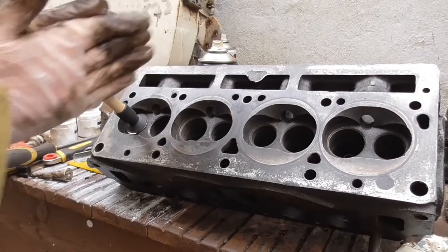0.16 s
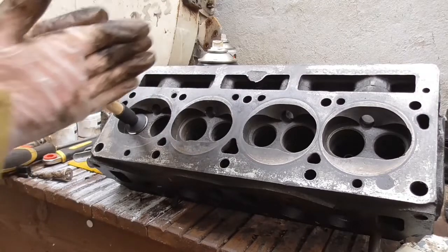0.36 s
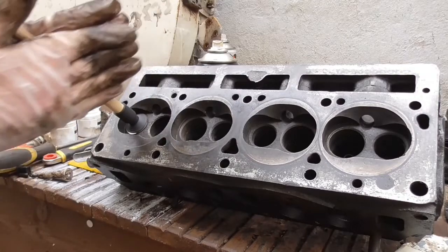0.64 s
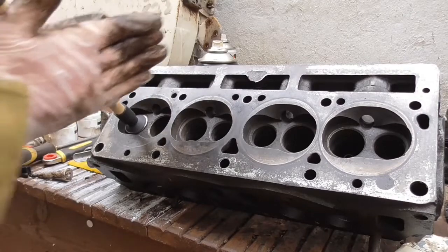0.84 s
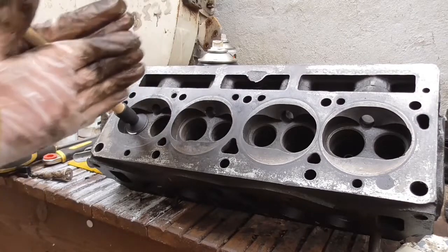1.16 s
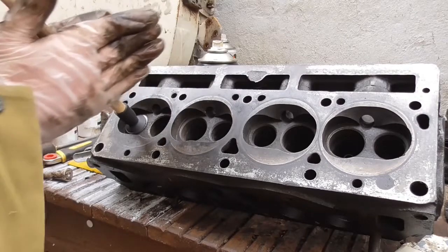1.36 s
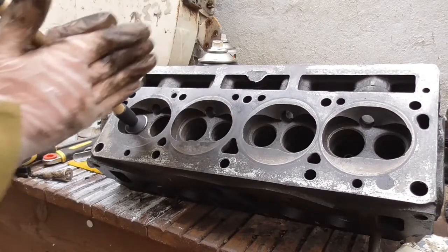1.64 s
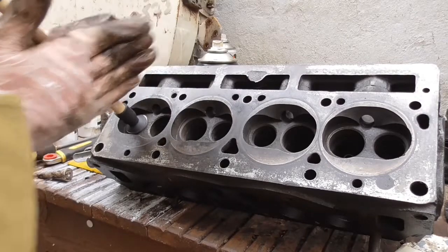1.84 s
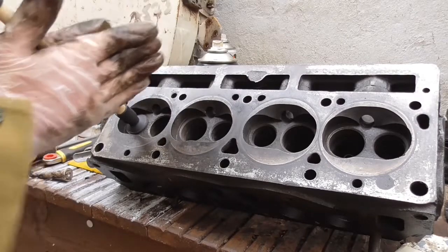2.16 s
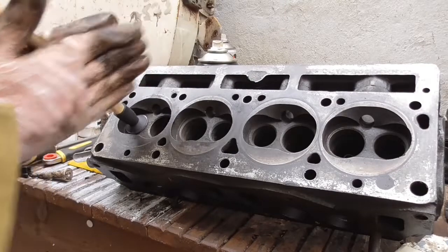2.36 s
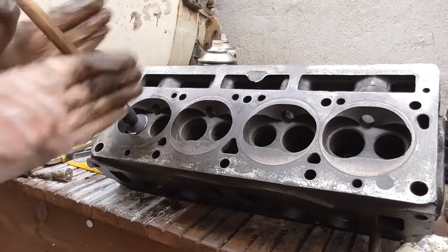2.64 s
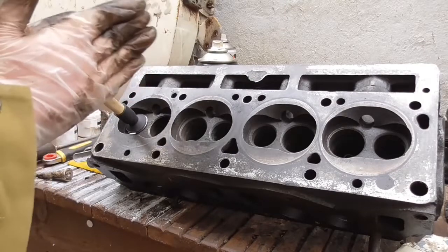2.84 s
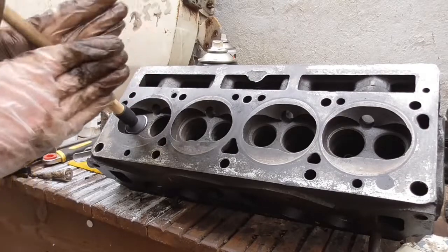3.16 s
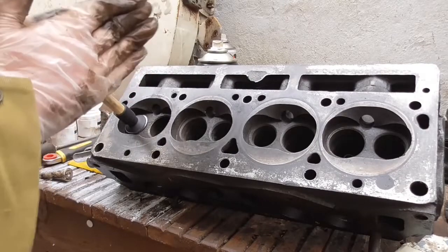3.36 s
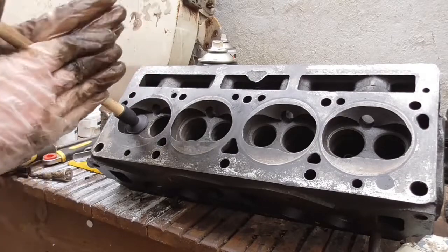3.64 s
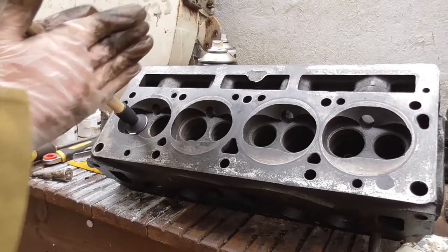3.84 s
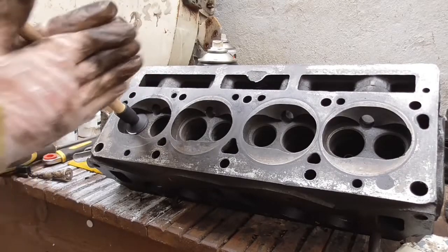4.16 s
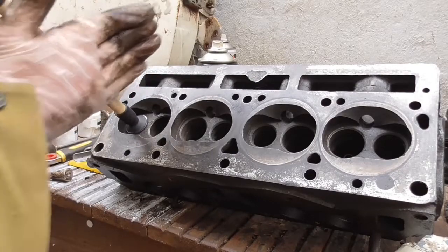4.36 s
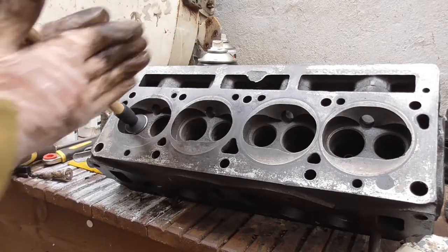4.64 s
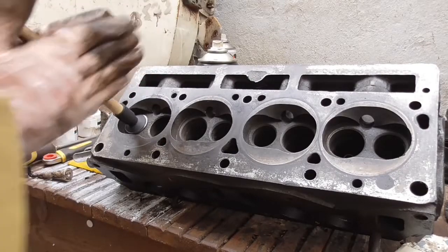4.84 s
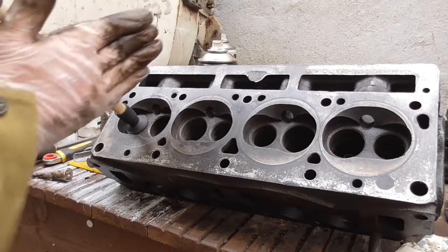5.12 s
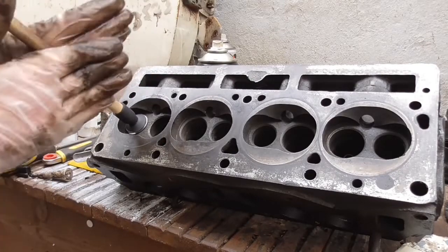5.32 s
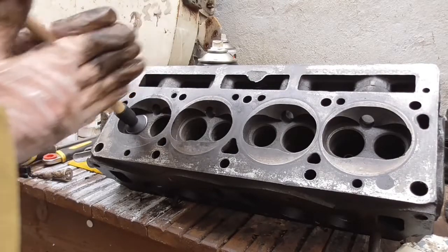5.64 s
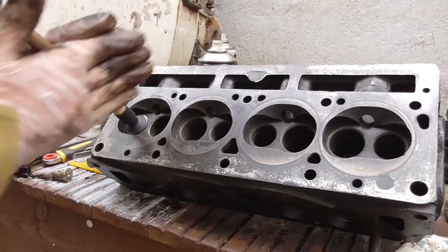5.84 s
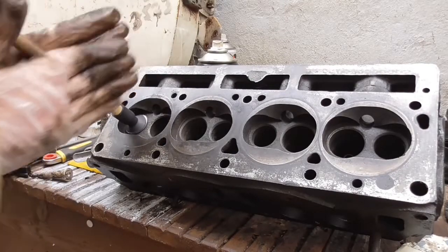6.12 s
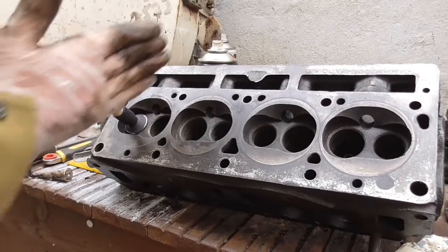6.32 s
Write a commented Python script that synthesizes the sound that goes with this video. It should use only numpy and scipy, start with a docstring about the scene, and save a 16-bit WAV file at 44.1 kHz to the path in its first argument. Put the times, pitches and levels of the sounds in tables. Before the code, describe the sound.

From 0 s, already under way, a metal valve is ground back and forth in abrasive paste, close to the microphone. Each stroke lasts about a fifth of a second: a bright sandy hiss rising and falling with speed, a dry metallic ring from valve and heavy casting, and a hollow, woody-sounding judder near 1 kHz, broken by uneven short bites. Strokes lengthen slightly from 2 s and stop around 2.55 s. Tiny wet smacks and crackles fill the gap near 2.8 s; one longer scrape runs from 2.85 to 3.2 s, then another sticky pause until 3.4 s. A strong biting stroke restarts the steady rhythm, which continues to the cut-off near 6.5 s. Behind lies soft distant traffic: a low car hum from 1.5 s, then a lorry and passing drones from about 4 s, swelling loudest near 5.8 s before easing.

```python
"""An engine valve is lapped: a stick rolled between the palms twists it back and forth on its seat.
From the start grinding paste hisses with the speed of each twist and rings casting and valve; where the
grit bites, stick and slip judder the valve near 1 kHz. Behind it filtered noise makes far traffic.
Wet smacks crackle, mostly in the pauses around 2.7 and 3.3 s. From 1.5 s on wavering sine tones add
a car, then a lorry and passing drones, and the traffic swells to its loudest near 5.8 s."""
import sys
import numpy as np
from scipy import signal
from scipy.fft import rfft, irfft, next_fast_len
from scipy.io import wavfile
from scipy.ndimage import uniform_filter1d

SR = 44100
rng = np.random.default_rng(int(sys.argv[2]) if len(sys.argv) > 2 else 0)


def pcm_store(signal):
    """Save signal as 16-bit PCM."""
    levels = np.round(np.clip(np.atleast_2d(signal), -1, 1) * 32767)
    wavfile.write(sys.argv[1], SR, levels.astype(np.int16).T)


N = 285768
TIME = np.arange(N) / SR   # seconds

# Table levels are relative: each layer trims them further.
# twists of the stick, forward and back in turn: (start [s], end [s], grit [dB], judder [dB])
TWISTS = [(-.12, .086, -45.5, -39.5), (.084, .28, -48, -34), (.284, .5, -44.5, -36.5),
          (.508, .73, -46, -36), (.728, .93, -44.5, -35.5), (.924, 1.136, -42, -32.5),
          (1.15, 1.348, -44, -31.5), (1.358, 1.535, -42.5, -34), (1.552, 1.778, -43, -32.5),
          (1.782, 2.012, -41, -33), (2.02, 2.28, -42.5, -33), (2.276, 2.545, -42.5, -35.5),
          (2.851, 3.195, -42.5, -32.5), (3.425, 3.705, -41, -34), (3.708, 3.92, -43.5, -32.5),
          (3.931, 4.124, -42, -33), (4.129, 4.35, -42, -35.5), (4.356, 4.555, -41.5, -36),
          (4.566, 4.775, -40.5, -35), (4.776, 4.96, -41.5, -33), (4.981, 5.165, -42.5, -35),
          (5.183, 5.36, -42.5, -33.5), (5.385, 5.56, -42.5, -32.5), (5.578, 5.745, -42, -34),
          (5.78, 5.99, -42.5, -37), (6, 6.205, -41, -34), (6.215, 6.4, -43, -44.5), (6.42, 6.6, -41, -35)]
# how each direction sounds: (fastest point [share of twist], casting ring over grit [dB],
# valve ring over grit [dB])
FORWARD_TWIST = (.44, -6.5, -7)
BACK_TWIST = (0.58, -13, -6.5)
# the hardest bites of the grit: (start [s], length [s], level [dB])
BITES = [(.033, 0.014, -31.5), (.135, 0.027, -28.5), (.193, 0.019, -28), (.225, 0.029, -31),
         (.539, 0.036, -33.5), (.772, 0.019, -31), (.812, .015, -30.5), (1.029, .023, -31),
         (1.511, 0.017, -30.5), (1.576, 0.04, -32.5), (2.035, 0.023, -33.5), (2.261, 0.0138, -35),
         (2.317, 0.047, -30), (2.384, 0.016, -28.5), (2.462, .021, -32.5), (3.036, 0.032, -29),
         (3.101, 0.0161, -31.5), (3.501, 0.0234, -25.5), (3.73, .012, -33), (3.813, .018, -29),
         (4.063, .015, -33), (4.147, 0.039, -31), (4.312, 0.035, -30), (4.382, 0.044, -35.5),
         (4.642, .023, -32), (4.876, 0.045, -29), (5.216, .026, -29.5), (5.245, .021, -29.5),
         (5.438, .018, -28), (5.466, .023, -30.5), (5.61, 0.037, -31), (5.705, 0.056, -32.5)]
# wet paste and skin smack as the grip shifts: (start [s], level [dB], time to fall 60 dB [s])
SMACKS = [(0.771, -41, 0.044), (1.83, -43, 0.034), (2.79, -46.5, 0.084), (2.826, -54, 0.28),
          (3.297, -48.5, 0.18), (3.336, -54, 0.28), (3.393, -49.5, 0.13)]
# the palms slide off and on to the stick: (peak time [s], half length [s], level [dB])
SLIDES = [(2.542, 0.025, -48), (2.597, 0.037, -80), (2.89, 0.031, -54), (3.167, 0.027, -50),
          (3.465, 0.034, -46.5)]

# resonances that the finest grit rings: (frequency [Hz], width [Hz], level [dB])
GRIT_MODES = [(6910, 70, -10), (8072, 45, -5), (8812, 60, -3.5), (9471, 50, 0), (9825, 50, -6),
              (9945, 60, -4), (11500, 60, -12), (11800, 80, -12), (12870, 90, -13)]
# resonances of the casting: (frequency [Hz], width [Hz], level [dB])
CASTING_MODES = [(1769, 4.2, 3.5), (1843, 7.1, 3), (1863, 106, -5.5), (2310, 18.6, 2), (3003, 140, -10)]
# resonances of the valve: (frequency [Hz], width [Hz], level [dB])
VALVE_MODES = [(3544, 20.6, 0), (3724, 42, -4), (3930, 42, -9.5), (4910, 14, -10.5), (5186, 15.4, -4.5)]
# low resonances of valve and head that lock into a judder: (frequency [Hz], width [Hz], level [dB])
JUDDER_MODES = [(860.4, 15.3, -9.5), (931, 46.5, -3.5), (969, 43.8, 0.5), (998.2, 18.7, -1),
                (1090, 53, -21), (1149, 9.6, -26.5)]
# resonances rattled by loose grains: (frequency [Hz], width [Hz], level [dB])
RATTLE_MODES = [(1121, 42, 0), (1186, 32, -1), (1315, 110, -5), (1482, 50, -6)]

# spectrum of the grit hiss: (frequency [Hz], level per Hz [dB])
GRIT_SPECTRUM = [(1400, -8), (2500, -9.5), (4500, -8), (6000, -10.5), (7500, -6.5), (8600, -1), (9700, 0.5),
                 (10800, -4), (12300, -9.5), (13200, -6), (14000, -14.5), (15000, -44)]
# spectrum of the smacks: (frequency [Hz], level per Hz [dB])
SMACK_SPECTRUM = [(1500, -17), (7000, -11.5), (10000, 0), (13000, -12.5), (15000, -24)]
# spectrum of the traffic noise: (frequency [Hz], level per Hz [dB])
ROAD_SPECTRUM = [(28, -14), (45, -7.5), (65, -2), (85, -11), (130, -2), (240, 1.5), (400, -3), (700, -3.5),
                 (1000, -3), (1400, -13.5), (2000, -24.5), (3200, -30), (6500, -29), (10000, -26),
                 (15000, -40)]
# left-right likeness of the grit: (frequency [Hz], likeness [-1..1])
GRIT_LIKENESS = [(1500, 0.69), (3300, 1), (3900, 0.89), (5500, 0.81), (7300, 0.0028), (8700, 0.68),
                 (11500, 0.63), (13300, -0.16), (14500, -.2)]
# left-right likeness of the road: (frequency [Hz], likeness [-1..1])
ROAD_LIKENESS = [(60, 0.89), (150, 0.99), (300, 0.88), (700, 0.68), (2000, 0.23), (10000, 0.1)]
# stereo balance of the grit: (frequency [Hz], left minus right [dB])
GRIT_BALANCE = [(2000, -0.5), (5000, 0.5), (7500, 1), (9500, 1), (12500, -6), (14500, -4)]
# stereo balance of the road: (frequency [Hz], left minus right [dB])
ROAD_BALANCE = [(200, -1.8), (900, -1.2)]

# traffic noise: (time [s], rumble [dB], tyre noise [dB])
TRAFFIC = [(0, -52.5, -57.5), (1, -54, -55), (2.2, -51.5, -56), (3.3, -49.5, -55), (5, -52.5, -52.5),
           (5.8, -45, -48.5), (6.48, -49.5, -52.5)]
# a car speeds up and eases off: (time [s], firing rate [Hz], firing tone [dB])
CAR = [(1.5, 60.5, -61), (1.83, 62.3, -55.5), (2.75, 73.4, -60.5), (3.38, 70.2, -61), (3.9, 57.5, -54)]
# a lorry swells, then fades: (time [s], firing rate [Hz], firing tone [dB], its octave [dB])
LORRY = [(4.0, 49.1, -59, -69), (4.718, 49.6, -57, -67), (5.046, 50.8, -65, -52), (5.402, 51.8, -49, -44),
         (5.63, 51.8, -46, -58), (5.9, 51.8, -61, -56)]
# drones of passing vehicles: (loudest time [s], half length [s], frequency [Hz], level [dB])
DRONES = [(4.75, .35, 252, -54), (4.6, .4, 181, -61), (5.9, .25, 214, -51), (5.95, .35, 124, -56)]

EASY_TWIST_S = 0.18   # a twist this long is near a plain half swing; longer ones start and end more gently
CATCHES_PER_S, CATCH_S, CATCH_DB = 18, 0.013, 0.5   # lesser bites; mean level over the twist's judder
BITE_ATTACK_S, BITE_RELEASE_S = .007, .0044
JUDDER_LEAD_S = .00005   # the judder reaches the left side first
SMACK_GRAINS_PER_S, SMACK_SPREAD_DB = 4000, 1.5
ENGINE_FADE_DB_PER_S = 11   # before and after a vehicle is within earshot
CUTOFF_HZ = 15500


def from_db(db):
    """Decibels to gain."""
    return 10 ** (np.asarray(db) / 20)


def rms_one(x):
    """Scales a sound to rms 1."""
    return x / np.sqrt(np.mean(x ** 2) + 1e-20)


def in_time(rows):
    """Each column of a curve at every sample."""
    s, *columns = np.transpose(rows)
    return [np.interp(TIME, s, column) for column in columns]


def at_hz(points, hz):
    """Reads a curve on a log-frequency axis."""
    known_hz, values = np.transpose(points)
    return np.interp(np.log(hz + 1), np.log(known_hz), values)


def drift(rate_hz):
    """Slow random wander of rms 1: twice-smoothed noise, made at every 40th sample."""
    r = np.exp(-80 * np.pi * rate_hz / SR)
    noise = rng.standard_normal(N // 40 + 2002)
    slow = signal.lfilter([1], [1, -2 * r, r * r], noise)[2000:]   # drop the settling
    return np.interp(np.arange(N) / 40, np.arange(len(slow)), rms_one(slow))


def bump(peak_s, half_s):
    """A smooth swell and fade around its peak."""
    return np.exp(-np.minimum(((TIME - peak_s) / half_s) ** 2, 20))


def pan(left_db):
    """Gains of the two channels, left over right by so many dB."""
    return from_db(np.array([[.5], [-.5]]) * left_db)


def widen(mid, side, alike):
    """Left and right of a given likeness from two unrelated signals."""
    alike = np.clip(alike, -.99, .99)
    return np.sqrt(1 + alike) * mid + np.sqrt(1 - alike) * side * np.array([[1], [-1]])


def colour(pair, spectrum, likeness, balance):
    """Gives two steady noises a spectrum and a stereo image; rms 1."""
    size = next_fast_len(N)
    hz = np.arange(size // 2 + 1) * SR / size
    image = widen(*rfft(pair, size), at_hz(likeness, hz)) * pan(at_hz(balance, hz))
    shaped = image * from_db(at_hz(spectrum, hz))
    return rms_one(irfft(shaped, size)[:, :N])


def resonate(force, modes, gains=None):
    """Parallel resonances, each with an optional moving gain; white force of rms 1 comes out near rms 1."""
    out, power = 0, 0
    for k, (hz, width_hz, db) in enumerate(modes):
        r = np.exp(-np.pi * width_hz / SR)
        feed = (1 - r * r) / 2 * np.array([1, 0, -1])
        feedback = [1, -2 * r * np.cos(2 * np.pi * hz / SR), r * r]
        drive = force if gains is None else force * gains[k]
        # neighbouring modes take opposite signs
        out = out + (-1) ** k * from_db(db) * signal.lfilter(feed, feedback, drive)
        power += from_db(db) ** 2 * np.pi * width_hz / SR
    return out / np.sqrt(power)


def grains(per_s, spread_db):
    """Two streams of tiny fractures of uneven size, struck at the same instants; rms 1."""
    sizes = from_db(spread_db * rng.standard_normal(N))
    struck = rng.random(N) < per_s / SR
    return rms_one(sizes * struck * rng.standard_normal((2, N)))


def twisting(grit_rest=0.22, ring_rest=0.69, judder_rest=0.79, judder_power=0.41, slip_speed=0.2,
             grab_s=0.011, easing=0.98):
    """The valve speeds up, slows and turns round; its speed sets the force of grit, ring and judder."""
    sliding, levels = np.zeros(N), []
    for k, (start, end, grit_db, judder_db) in enumerate(TWISTS):
        fastest_share, casting_db, valve_db = BACK_TWIST if k % 2 else FORWARD_TWIST
        fastest = start + np.clip(fastest_share, .1, .9) * (end - start)
        during = (TIME > start) & (TIME < end)
        angle = np.pi * np.interp(TIME[during], [start, fastest, end], [0, .5, 1])
        gentleness = ((end - start) / EASY_TWIST_S) ** easing
        sliding[during] = np.abs(np.sin(angle)) ** gentleness
        levels.append((fastest, grit_db, grit_db + casting_db, grit_db + valve_db, judder_db))
    grit, casting, valve, body = from_db(in_time(levels))
    # the valve rocks a little through quick turns and lies still only in the pauses
    rocking = uniform_filter1d(sliding, size=4000) * (1 - sliding)
    # the rubber cup winds up, so the seat grabs a moment after each turn
    grinding = np.interp(TIME - grab_s, TIME, sliding)
    ringing = grinding + ring_rest * rocking
    # stick and slip need a least speed
    slipping = grinding ** 4 / (grinding ** 4 + slip_speed ** 4)
    juddering = grinding ** judder_power * slipping
    return (grit * (sliding + grit_rest * rocking), casting * ringing, valve * ringing,
            body * (juddering + judder_rest * rocking))


def paste(force, hiss_db=-2.5, ring_db=-8.0, smack_db=-2, flutter_db=1.38):
    """Crushed grit hisses, clumps a little and rings the highest modes; smacks crackle more coarsely."""
    force = force * from_db(flutter_db * drift(22))
    hiss_grains = grains(per_s=16000, spread_db=3.0)
    hiss = force * colour(hiss_grains, GRIT_SPECTRUM, GRIT_LIKENESS, GRIT_BALANCE)
    ring = widen(*resonate(force * grains(per_s=12000, spread_db=2), GRIT_MODES), alike=0.61)
    smack_grains = grains(SMACK_GRAINS_PER_S, SMACK_SPREAD_DB)
    crackle = smacks() * colour(smack_grains, SMACK_SPECTRUM, GRIT_LIKENESS, GRIT_BALANCE)
    return from_db(hiss_db) * hiss + from_db(ring_db) * ring + from_db(smack_db) * crackle


def metal(force, modes, level_db, wander_db):
    """Coarser grains ring the metal; the contact shifts round the seat and starves now one mode, now another."""
    strikes = force * grains(per_s=4000, spread_db=2.0)
    shifting = [from_db(wander_db * np.minimum(drift(16.0), .5)) for mode in modes]
    return from_db(level_db) * widen(*resonate(strikes, modes, shifting), alike=0.97)


def judder(force, bites, rub_db=-8.0, bite_db=-4, knots_db=2, scatter_db=-17, loose_db=-17):
    """Stick and slip lock on to the low modes, so their swing follows the drive closely."""
    # the soft paste passes little of this force to the treble
    soft = signal.butter(2, [650, 1900], "band", fs=SR, output="sos")
    rung = resonate(grains(per_s=3000, spread_db=1.5), JUDDER_MODES)
    swing, scattered = rms_one(signal.sosfilt(soft, rung))
    # friction limits the swing, which evens out its chance swells
    power = uniform_filter1d(uniform_filter1d(swing ** 2, size=180), size=180)
    swing = rms_one(swing / (power + .02) ** .36)
    # the rubbing comes in small knots
    knots = from_db(knots_db * np.minimum(drift(52), 1))
    drive = np.hypot(from_db(rub_db) * force * knots, from_db(bite_db) * bites)
    # loose grains rattle the casting just above the judder
    rattle = widen(*resonate(force * grains(per_s=2500, spread_db=0.5), RATTLE_MODES), alike=0.89)
    # the scattered part is opposite on the two sides
    wide_swing = swing + from_db(scatter_db) * scattered * np.array([[1], [-1]])
    return (drive * wide_swing + from_db(loose_db) * rattle) * pan(left_db=1.5)


def from_left(pair):
    """The right channel hears the sound a moment later."""
    return np.array([pair[0], np.interp(TIME - JUDDER_LEAD_S, TIME, pair[1])])


def road(rumble_db=4.0, tyres_db=5.5, split_hz=360):
    """Far traffic: noise split into a low rumble and the brighter roar of tyres, each with its own level."""
    rumble_level, tyre_level = in_time(TRAFFIC)
    noise = colour(rng.standard_normal((2, N)), ROAD_SPECTRUM, ROAD_LIKENESS, ROAD_BALANCE)
    low = signal.sosfiltfilt(signal.butter(2, split_hz, fs=SR, output="sos"), noise)
    tyres = noise - low
    return from_db(rumble_level + rumble_db) * low + from_db(tyre_level + tyres_db) * tyres


def catches(unevenness=0.38, spread_db=2):
    """Rows of lesser bites, unevenly spaced and of unequal strength."""
    timing, strength = rng.uniform(-1.1, 1, size=(200, 2)).T
    starts = (np.arange(len(timing)) + unevenness * timing) / CATCHES_PER_S
    return [(s, CATCH_S, CATCH_DB + db) for s, db in zip(starts, spread_db * strength)]


def biting(bites):
    """Strength of the bites: each sets in within milliseconds, holds and dies away."""
    strength = np.zeros(N)
    for start, length, db in bites:
        during = slice(*np.searchsorted(TIME, [start - BITE_ATTACK_S, start + .12]))
        age = TIME[during] - start
        rise = np.clip(age / BITE_ATTACK_S + .5, 0, 1)
        fall = np.exp(-np.maximum(age - 0.58 * length, 0) / BITE_RELEASE_S)
        strength[during] += from_db(db) * rise * fall
    return strength


def smacks():
    """Force of the wet smacks, which start at once and fade, and of the slides, which swell smoothly."""
    force = np.zeros(N)
    for s, db, t60 in SMACKS:
        after = TIME >= s
        force[after] += from_db(db - 60 * np.minimum((TIME[after] - s) / t60, 2))
    for s, half_s, db in SLIDES:
        force += from_db(db) * bump(s, half_s)
    return force


def tone(hz, waver=0.0081, flutter_db=0.9):
    """A distant engine tone: a sine unsteady in pitch (waver as a share) and level; rms near 1."""
    phase = 2 * np.pi * np.cumsum(hz * (1 + waver * drift(5.3))) / SR
    return np.sqrt(2) * np.sin(phase) * from_db(flutter_db * drift(2.0))


def earshot(vehicle):
    """A vehicle fades in before its pass and out after it."""
    away_s = np.abs(TIME - np.clip(TIME, vehicle[0][0], vehicle[-1][0]))
    return from_db(-ENGINE_FADE_DB_PER_S * away_s)


def engines(car_db=-0.5, car_octave_db=-9, lorry_db=-1.5, lorry_octave_db=-1, drones_db=2.5):
    """Only low tones carry from the road: firing tones with their octaves, and passing drones."""
    hz, firing_db = in_time(CAR)
    car = tone(hz) + from_db(car_octave_db) * tone(2 * hz)
    out = earshot(CAR) * from_db(firing_db + car_db) * car
    hz, firing_db, octave_db = in_time(LORRY)
    firing = from_db(firing_db + lorry_db) * tone(hz)
    octave = from_db(octave_db + lorry_octave_db) * tone(2 * hz)
    out += earshot(LORRY) * (firing + octave)
    for s, half_s, hz, db in DRONES:
        out += from_db(db + drones_db) * bump(s, half_s) * tone(hz)
    return out * pan(left_db=-2.5)


def scene():
    """The lapping close by, the road far behind."""
    grit_force, casting_force, valve_force, judder_force = twisting()
    bites = np.maximum(biting(BITES), judder_force * biting(catches()))
    # a bite crushes extra grit, which also rings the casting
    grinding = paste(np.hypot(grit_force, from_db(-24) * bites))
    crush = from_db(-18.5) * bites
    casting = metal(np.hypot(casting_force, crush), CASTING_MODES, level_db=-7.5, wander_db=6.5)
    valve = metal(valve_force, VALVE_MODES, level_db=-8.5, wander_db=3.5)
    juddering = from_left(judder(judder_force, bites))
    return grinding + casting + valve + juddering + road() + engines()


def record(dry):
    """The top is cut steeply."""
    return signal.sosfilt(signal.ellip(10, .1, 80, CUTOFF_HZ, fs=SR, output="sos"), dry)


dry = scene()
out = record(dry)
pcm_store(out)
```